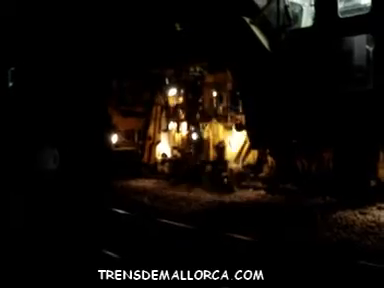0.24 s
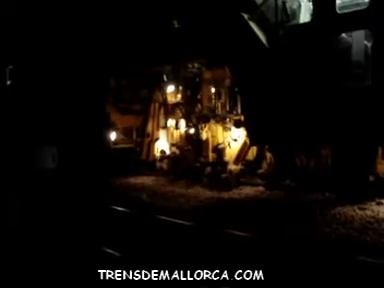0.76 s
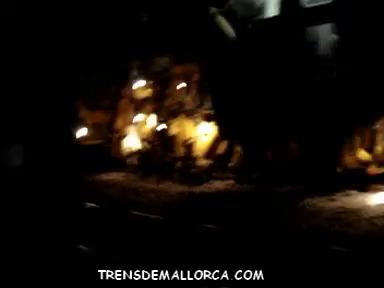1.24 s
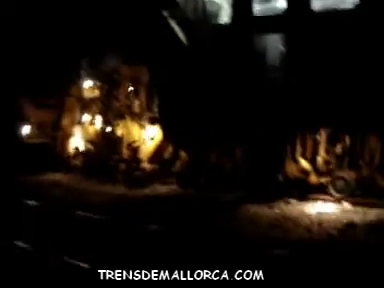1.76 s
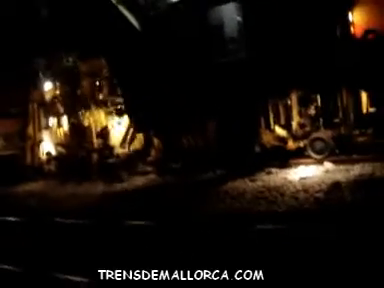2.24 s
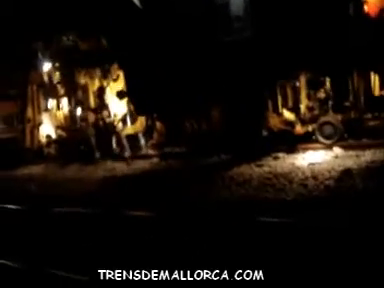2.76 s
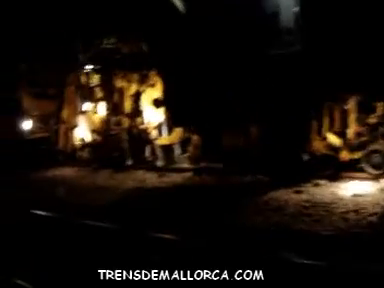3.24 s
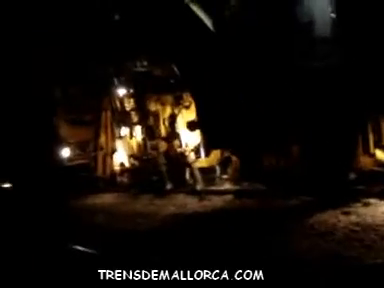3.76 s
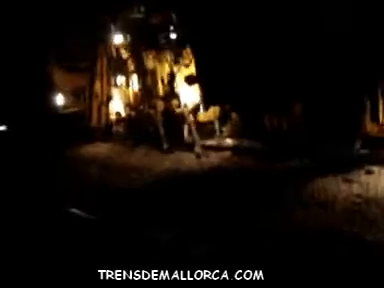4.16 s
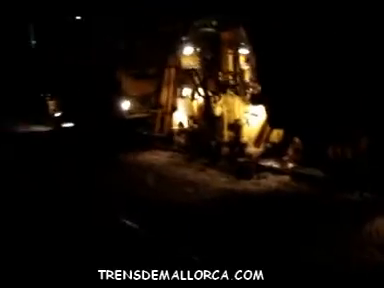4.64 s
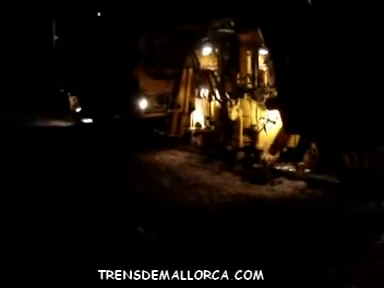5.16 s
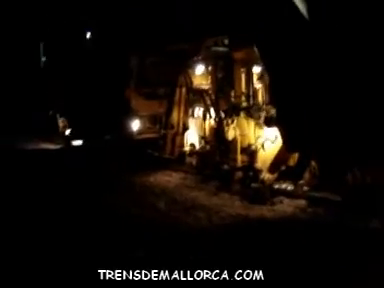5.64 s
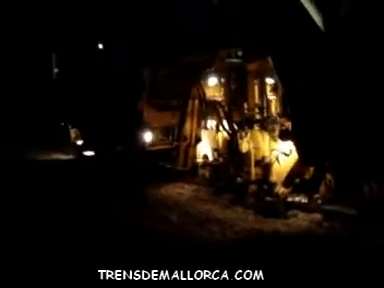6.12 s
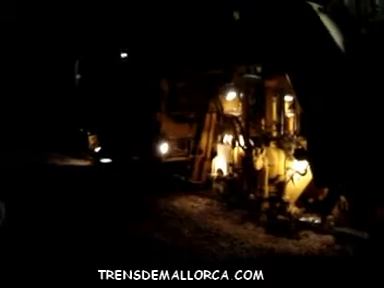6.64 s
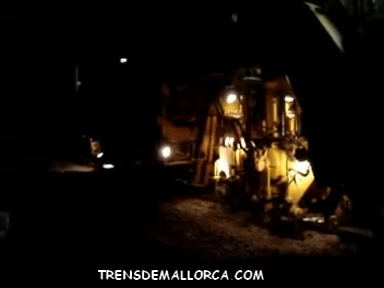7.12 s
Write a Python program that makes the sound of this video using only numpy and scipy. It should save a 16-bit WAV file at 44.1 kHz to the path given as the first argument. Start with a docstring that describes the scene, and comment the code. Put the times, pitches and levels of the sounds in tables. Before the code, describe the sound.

Outdoors beside a railway track, a ballast tamping machine works close by. Diesel drone and fan roar stay constant. Stones knock and an air valve hisses at the start while the vibrating tines hum and rattle; then pipes rush with oil as the unit lifts, air puffs again, and the churning returns in shorter cycles under a brighter hiss. Fairly close, full, centred pickup with slight reflections.

```python
"""Beside a railway track: a tamping machine at work, both channels alike.
Harmonic sines make the diesel drone, the pump whine and the hum and singing of the tamping unit.
Tine blows and random stone contacts ring frame and plates; a throbbing rush climbs and sinks in pitch.
Shaped noise makes the roar, rushing oil, hisses of air and knocks; a drifting ground echo combs the roar.
"""
import sys
import numpy as np
from scipy import signal
from scipy.fft import rfft, irfft, next_fast_len
from scipy.io import wavfile
from scipy.ndimage import map_coordinates

SR = 44100
rng = np.random.default_rng(int(sys.argv[2]) if len(sys.argv) > 2 else 0)


def wrap_up_sound(samples):
    """Save the sound to the file named by the first command line argument, as 16-bit audio."""
    columns = np.atleast_2d(samples).T
    # keep every value between -1 and 1, then stretch to whole-number steps
    tamed = np.clip(columns, -1, 1)
    steps = np.round(tamed * 32767).astype(np.int16)
    wavfile.write(sys.argv[1], SR, steps)


N = 325437

# Roar of engine bay and fans: (time [s], relative level [dB])
ROAR_DB = [(0, -23.5), (.55, -23), (.9, -24.5), (2, -25.5), (2.95, -24.5), (3.7, -25), (4.05, -24),
           (5, -23.5), (5.8, -25), (6.78, -24.5), (6.93, -23), (7.38, -23.3)]
# Low rumble: (time [s], relative level [dB])
RUMBLE_DB = [(0, -33), (.6, -28.7), (1.4, -32), (2.6, -32.5), (4, -31), (5, -30), (5.8, -36.5),
             (6.7, -36.5), (6.92, -31), (7.38, -32)]
# Spectra of rumble, roar body and fizz: (frequency [Hz], relative density [dB per Hz])
RUMBLE_SPECTRUM = [(20, -36.5), (50, -14), (85, -9.5), (125, -2.5), (175, -4), (230, -2), (285, 2),
                   (350, -2), (430, -10.5), (600, -14), (1200, -59.5)]
BODY_SPECTRUM = [(200, -19), (400, 0), (550, 0.5), (800, 4.5), (1100, 2), (1300, 1), (1470, 0.5),
                 (1700, -.5), (1950, 0), (2250, -2.5), (2700, 1), (3100, -1), (3500, -7), (5000, -21),
                 (9000, -41)]
FIZZ_SPECTRUM = [(1500, -33), (3000, -3.5), (4000, -2.5), (5000, -2), (6000, -3), (7800, -7), (9400, -7),
                 (10200, -13.5), (11000, -17.5), (12000, -43.5)]
# Ground echo: (time [s], first reinforced frequency [Hz], echo share [0-1])
GROUND_ECHO = [(0, 670, 0.28), (1.5, 830, 0.22), (1.9, 866, 0.6), (2.7, 1040, 0.37), (3.6, 1153, 0.44),
               (4.2, 1177, 0)]

# Diesel: (time [s], firing rate [Hz])
FIRING_HZ = [(0, 112), (.2, 109.1), (.8, 108.8), (1.4, 107.7), (2.15, 107), (3.1, 108.2), (4, 108.4),
             (4.22, 111.8), (4.42, 112.4), (4.7, 108.5), (6.1, 107.3), (6.7, 107.1), (6.95, 110.9),
             (7.38, 110.7)]
# Exhaust fundamental, second and third harmonic: (time [s], relative level [dB])
FIRST_DB = [(0, -29), (1.5, -27), (2, -24), (3.85, -24), (4.68, -29), (5.6, -25.5), (6.4, -26),
            (7.38, -28.5)]
SECOND_DB = [(0, -34.5), (.5, -33.5), (2.6, -29), (4.5, -31), (6.3, -29), (7.38, -30)]
THIRD_DB = [(0, -29), (1.5, -32), (3, -30.5), (4.55, -30), (4.63, -44), (6.7, -45), (6.85, -34.5),
            (7.38, -34)]
# Weak engine lines: (multiple of firing rate [-], mean level [dB])
ENGINE_LINES = [(1.29, -50), (1.5, -45.5), (2.25, -44), (2.5, -44.5), (2.7, -42), (5, -48.5)]

# Hydraulic pump: (time [s], piston rate before flutter [Hz])
PISTON_HZ = [(0, 348.5), (.45, 339), (1, 334.4), (1.35, 329.1), (1.7, 325.5), (2.15, 323.7), (2.6, 329.6),
             (3.1, 336.3), (3.35, 338.9), (4.2, 342.1), (4.45, 344.2), (4.7, 344.7), (5.05, 338.9),
             (5.5, 333), (6.1, 326.2), (6.4, 323.7), (6.9, 321.8), (7.38, 324.6)]
# Steady pump harmonics: (multiple of piston rate [-], relative level [dB])
PUMP_ORDERS = [(1, -44), (2, -39), (5, -44), (6, -43), (8, -43), (9, -42), (10, -46), (11, -48), (12, -46),
               (13, -51), (17, -52), (18, -53), (21, -57)]
# Pump harmonics singing out: (start [s], end [s], multiple of piston rate [-], relative level [dB])
SQUEALS = [(.85, 1.3, 2, -28.5), (.88, 1.5, 5, -35.5), (1.4, 2.15, 12, -41.5), (1.4, 2.45, 9, -36),
           (1.6, 2.75, 17, -44), (1.7, 3.3, 18, -47), (1.8, 2.35, 11, -43), (2.45, 3.6, 9, -34.8),
           (2.72, 3.1, 5, -29.8), (2.75, 3.1, 10, -33.5), (3, 4.15, 8, -39.5), (3.05, 3.6, 1, -38),
           (3.3, 3.66, 12, -38), (3.6, 4.1, 11, -40), (3.85, 4.15, 9, -35), (4.05, 4.38, 12, -35.2),
           (4.08, 4.45, 10, -34.5), (4.85, 5.5, 9, -36), (5.36, 5.58, 10, -34), (5.4, 5.6, 8, -33),
           (5.78, 6.08, 9, -27.8), (5.95, 6.22, 10, -32.5), (6.08, 6.55, 9, -36), (6.45, 7.2, 11, -40),
           (6.95, 7.25, 10, -36.5)]
SQUEAL_EDGE_S = 0.138  # swell and fade

# Oil through the valves while the tamping unit is raised: (time [s], level [dB])
OIL_DB = [(0, -68.5), (2.5, -36), (3.1, -27.5), (3.9, -26), (4.6, -34), (5.3, -62.5)]
# Pipe resonances: (frequency [Hz], width [Hz], relative level [dB])
PIPES = [(450.4, 46, 1.5), (1136, 52, 1.5), (1450, 137, -9), (1960, 138, 0)]

# Air valves: (time [s], open time [s], peak level [dB], rise constant [s],
#              decay to -60 dB [s], brightness [dB per octave])
AIR_VALVES = [(.2, .01, -21, 0.0135, 0.17, 0), (.24, .04, -18, .018, 1.3, .7),
              (2.484, .018, -22, .005, .06, 2.4), (4.51, .04, -20.2, .024, .45, 1.1),
              (4.59, .06, -23.5, .02, .15, 1.3)]
# Air spectrum before brightness: (frequency [Hz], relative density [dB per Hz])
AIR_SPECTRUM = [(800, -14.5), (1500, -3), (2500, 2.5), (3400, 2.5), (4500, -.5), (6000, -5.5), (9400, -11),
                (10300, -23), (12000, -32)]
# Upper hiss: (time [s], level before throb [dB])
HISS_DB = [(0, -43), (2.8, -44.5), (3.3, -42.5), (4.4, -33.5), (4.9, -32.5), (5.5, -30.5), (5.9, -33.5),
           (6.78, -35.5), (6.88, -31.5), (7.38, -31.5)]
# Hiss spectrum: (frequency [Hz], relative density [dB per Hz])
HISS_SPECTRUM = [(2500, -29), (3400, 0), (4200, 1), (4700, -10.5), (6000, -30.5)]

# Throbbing rush: (time [s], centre [Hz], relative level [dB])
RUSH = [(.3, 620, -32), (.85, 790, -28.5), (1.6, 850, -25), (2.2, 875, -27.5), (2.6, 950, -27.5),
        (3.1, 905, -31), (4.15, 860, -30), (4.4, 790, -28.5), (4.62, 650, -33), (4.82, 610, -24),
        (5.02, 590, -28), (5.6, 616.8, -44)]
# Rush surges as ballast gives way: (time [s], centre [Hz], peak level before throb [dB], Gaussian sigma [s])
SURGES = [(0.489, 600, -24, 0.028), (0.729, 700, -19, 0.0287), (1.073, 760, -25.5, 0.0263),
          (1.59, 850, -21, 0.0207), (2.22, 840, -30, .05), (4.37, 640, -24.5, 0.045), (4.85, 670, -26, .08)]

# Stones struck by the tines: (time [s], relative peak [dB])
KNOCKS = [(0.196, -3.5), (0.462, -4), (0.495, -4.5), (0.582, -5.5), (0.737, -4.5), (0.883, -6.5),
          (1.504, -9), (1.593, -12.5), (3.24, -9), (5.139, -9)]
# Stone spectrum: (frequency [Hz], relative density [dB per Hz])
STONE_SPECTRUM = [(200, -35.5), (500, 4), (750, -0.5), (1300, -6), (2800, -11.5), (5000, -14),
                  (10000, -29.5)]
# Resonances of frame and plates: (frequency [Hz], width [Hz], relative level [dB])
FRAME = [(559.2, 34.5, -1), (586.9, 30, -2.5), (677, 45, -.5)]
PLATE = [(1128, 42, 6), (1474, 56, -7.5), (1899, 31, -1)]

# Tamping unit: (time [s], vibration rate before random drift [Hz])
VIBRATION_HZ = [(0, 34.51), (1.5, 33.11), (2.2, 33.3), (3, 34.5), (4.3, 35.11), (6, 32.62), (6.5, 32.2),
                (7.38, 32.46)]
# Tine hum: (multiple of vibration rate [-], relative level [dB])
TINE_ORDERS = [(1, -18.5), (2, 0.5), (3, -9), (5, -3), (6, -2.5)]
# Vibration harmonics meeting a resonance: (start [s], end [s], multiple of vibration rate [-], mean level [dB])
SINGING = [(3.3, 4.35, 4, -35), (4.9, 5.25, 6, -32), (5.25, 6.8, 6, -39), (5.0, 5.9, 20, -32.5),
           (5.0, 5.55, 16, -35), (5.0, 5.6, 34, -33), (5.0, 5.6, 33, -32), (5.55, 6.2, 34, -35),
           (5.7, 6.45, 21, -34), (6.2, 7.2, 20, -35), (6.3, 7.38, 18, -32.3), (6.45, 7.38, 35, -32.5),
           (6.75, 7.2, 34, -32), (6.85, 7.38, 33, -36), (7.08, 7.38, 21, -30)]
# Squeezes in the ballast: (start [s], end [s], relative hum [dB], relative frame ring [dB],
#                           relative plate ring [dB])
SQUEEZES = [(0.557, 1.62, -43.5, -23.5, -32.5), (2.0, 2.22, -46.5, -29.5, -38.5),
            (4.7, 5.25, -45.5, -26, -25), (5.45, 5.951, -45.5, -25, -29), (6.279, 6.52, -49, -26, -28),
            (6.75, 7.382, -49, -26, -28)]
LOWER_S, SETTLE_S, GRIP_S = 0.637, 0.229, 0.304  # frame lead, edge length, plate lag
BITE_S, PLUNGE_DB, PLUNGE_S = 0.076, 7.5, 0.67  # hum rise; surge dying as the stones yield
FREE_HUM_DB, FREE_FRAME_DB, FREE_PLATE_DB = -52.5, -34, -34  # tines swinging free, relative

TOP_HZ = 11450


def amp(db):
    """Decibels to gain."""
    return 10 ** (np.asarray(db) / 20)


def unit(x):
    """Scale to rms 1."""
    return x / np.sqrt(np.mean(x ** 2) + 1e-20)


def curves(rows):
    """One value per sample for each column after the time."""
    time_s, *columns = np.transpose(rows)
    return [np.interp(np.arange(N) / SR, time_s, column) for column in columns]


def since(start_s):
    """Seconds since start_s, 0 before it."""
    return np.maximum(np.arange(N) / SR - start_s, 0)


def gate(start_s, end_s, rise_s, fall_s):
    """0-1 envelope with linear edges centred on start and end."""
    t = np.arange(N) / SR
    return np.clip(.5 + np.minimum((t - start_s) / rise_s, (end_s - t) / fall_s), 0, 1)


def wobble(rate_hz):
    """Smooth random curve, rate_hz knots a second."""
    position = np.arange(N) * rate_hz / SR
    grid = np.arange(0, position[-1] + 1, 1 / 8)
    knots = rng.standard_normal(int(position[-1]) + 4)
    return np.interp(position, grid, map_coordinates(knots, [grid]))


def filtered(x, response):
    """Multiply the spectrum of x by a function of frequency."""
    m = next_fast_len(N + SR // 2)
    return irfft(rfft(x, m) * response(np.fft.rfftfreq(m, 1 / SR)), m)[:N]


def coloured(x, spectrum):
    """Shape x by a (Hz, dB) spectrum, at rms 1."""
    f, db = np.transpose(spectrum)
    return unit(filtered(x, lambda hz: amp(np.interp(np.log(hz + 1), np.log(f), db))))


def resonate(x, modes):
    """Parallel resonances of alternating sign, at rms 1."""
    def response(f):
        total = 0
        for k, (centre, width, db) in enumerate(modes):
            damping = 1j * f * width
            total = total + (-1) ** k * amp(db) * damping / (centre ** 2 - f * f + damping)
        return total
    return unit(filtered(x, response))


def noise(patchy_db):
    """Noise with random gain patches in time and frequency, at rms 1."""
    z = signal.stft(rng.standard_normal(N), nperseg=1024)[2]
    patch = np.outer(np.hanning(16), np.hanning(14))
    field = signal.fftconvolve(rng.standard_normal(z.shape), patch, "same")
    return unit(signal.istft(z * amp(patchy_db * unit(field)), nperseg=1024)[1][:N])


def noise_band(hz, half_width_hz):
    """Narrow noise on quadrature carriers at a moving centre, at rms 1."""
    def lowpass(f):
        return 1 / (1 + (f / half_width_hz) ** 2)
    in_phase = filtered(rng.standard_normal(N), lowpass)
    quadrature = filtered(rng.standard_normal(N), lowpass)
    centre = angle(hz)
    return unit(in_phase * np.cos(centre) + quadrature * np.sin(centre))


def angle(hz):
    """Running phase [rad] at a varying rate, from a random start."""
    return 2 * np.pi * (np.cumsum(hz) / SR + rng.random())


def tone(phase, db):
    """Sine of the given rms level, randomly offset in phase."""
    return np.sqrt(2) * amp(db) * np.sin(phase + 2 * np.pi * rng.random())


def walls(x, share=0.1885, count=14):
    """Weak copies from the machine's sides and nearby walls comb the sound."""
    delay_s = rng.uniform(.004, .04, count)
    gain = rng.choice([-1, 1], count) / np.sqrt(count)
    copies = sum(g * np.pad(x, (int(d * SR), 0))[:N] for d, g in zip(delay_s, gain))
    return (x + share * copies) / np.hypot(1, share)


def ground_echo(x, dull_hz=1050):
    """The ground returns a dull copy whose delay drifts as the machine moves."""
    hz, share = curves(GROUND_ECHO)
    echo = filtered(x, lambda f: 1 / (1 + (f / dull_hz) ** 4))
    return x + share * np.interp(np.arange(N) - SR / hz, np.arange(N), echo)


def roar(firing, shaft, rumble_db=1.7, body_db=4.0, fizz_db=-29.0, fizz_follows=0.66):
    """Engine bay and cooling fans: low rumble, broad body and fizz; the last two beat with the machinery."""
    level, = curves(ROAR_DB)
    beat_db = 0.213 * np.sin(firing) + 0.22 * np.sin(shaft)
    beat_db = beat_db + 0.803 * wobble(24) + 0.59 * wobble(90)
    low = amp(curves(RUMBLE_DB)[0] + rumble_db) * coloured(noise(patchy_db=1.0), RUMBLE_SPECTRUM)
    body = ground_echo(coloured(noise(patchy_db=0.44), BODY_SPECTRUM))
    mid = amp(level + body_db + beat_db) * body
    fizz_level = fizz_db + fizz_follows * (level - level.mean()) + beat_db
    fizz = amp(fizz_level) * coloured(noise(patchy_db=0.91), FIZZ_SPECTRUM)
    return low + mid + fizz


def diesel(firing, first_db=-1.0, waver_db=0.52, second_waver_db=0.66, third_waver_db=0.64):
    """Exhaust harmonics of the firing rate, plus weaker lines from unequal cylinders."""
    levels = [curves(FIRST_DB)[0] + first_db + waver_db * wobble(12),
              curves(SECOND_DB)[0] + second_waver_db * wobble(12),
              curves(THIRD_DB)[0] + third_waver_db * wobble(16)]
    drone = sum(tone(k * firing, db) for k, db in enumerate(levels, 1))
    lines = sum(tone(k * firing + 0.335 * wobble(7), db + 3 * wobble(3.09)) for k, db in ENGINE_LINES)
    return drone + lines


def pump(flutter=0.0004, level_db=-0.5, squeal_db=0.0, waver_db=1.5):
    """Wavering piston harmonics; now and then one squeals."""
    phase = angle(curves(PISTON_HZ)[0] * (1 + flutter * wobble(70)))
    whine = 0
    for k, db in PUMP_ORDERS:
        steady = amp(db + level_db + 1.86 * wobble(3.01))
        squeal = 0
        for start, end, multiple, peak_db in SQUEALS:
            if round(multiple) == round(k):
                edges = gate(start, end, SQUEAL_EDGE_S, SQUEAL_EDGE_S)
                squeal = squeal + amp(peak_db + squeal_db) * edges
        whine = whine + np.hypot(steady, squeal) * tone(round(k) * phase, waver_db * wobble(22))
    return whine


def oil_flow():
    """Oil forced through the valves sounds the pipework: noise through resonances."""
    return amp(curves(OIL_DB)[0]) * resonate(rng.standard_normal(N), PIPES)


def valves():
    """Air puffs swell quickly, hold while open and fade as the pressure drops."""
    t = np.arange(N) / SR
    puffs = 0
    for start, hold, db, rise, t60, tilt in AIR_VALVES:
        flow = amp(db - 60 * since(start + hold) / t60) * np.exp(np.minimum(t - start, 0) / rise)
        spectrum = [(hz, level + tilt * np.log2(hz)) for hz, level in AIR_SPECTRUM]
        puffs = puffs + flow * coloured(rng.standard_normal(N), spectrum)
    return puffs


def upper_hiss(shaft, throb_db=1.0):
    """Bright patchy noise, stronger in the second half, throbs with the tines."""
    level_db = curves(HISS_DB)[0] + throb_db * np.sin(shaft)
    return amp(level_db) * coloured(noise(patchy_db=1.5), HISS_SPECTRUM)


def strands(shaft, centre_hz, half_width_hz=62, jitter_rad=0.6, first_order=16, last_order=30):
    """Vibration harmonics stand out as a moving resonance passes them; rms 1."""
    rate_hz, = curves(VIBRATION_HZ)
    total = 0
    for k in range(first_order, last_order + 1):
        phase = k * shaft + 2 * np.pi * rng.random() + jitter_rad * wobble(20)
        total = total + np.sin(phase) / (1 + ((k * rate_hz - centre_hz) / half_width_hz) ** 2)
    return unit(total)


def sweeping_rush(shaft, half_width_hz=88, level_db=-2.2, strands_db=-4.5, throb_db=1.5, surge_width_hz=95):
    """Noise and tonal strands share a band that climbs and sinks; short surges add to it."""
    t = np.arange(N) / SR
    hz, db = curves(RUSH)
    rush = amp(db + level_db) * noise_band(hz, half_width_hz)
    swell = sum(amp(peak) * np.exp(-.5 * ((t - s) / sigma) ** 2) for s, _, peak, sigma in SURGES)
    surges = swell * noise_band(curves(SURGES)[0], surge_width_hz)
    throb = unit(amp(throb_db * np.sin(shaft)))
    return (rush + surges) * throb + amp(db + strands_db) * strands(shaft, hz)


def stones(t60_s=0.0643, level_db=-10):
    """Single hard knocks: noise bursts with instant onset and exponential decay."""
    t = np.arange(N) / SR
    blows = sum((t >= s) * amp(db + level_db - 60 * np.abs(t - s) / t60_s) for s, db in KNOCKS)
    return blows * coloured(rng.standard_normal(N), STONE_SPECTRUM)


def gravel(shaft, rate_hz, spread_db, throb_db):
    """Dense stone contacts of uneven size, weighted by each tine swing; rms 1."""
    hits = rng.random(N) < rate_hz / SR
    contacts = hits * rng.standard_normal(N) * amp(spread_db * rng.standard_normal(N))
    return unit(contacts * amp(throb_db * np.sin(shaft)))


def swings(shaft, scatter_db=2):
    """One tine blow per shaft turn, each of its own strength; rms 1."""
    turns = np.floor(shaft / (2 * np.pi))
    return unit(np.diff(turns, prepend=turns[0]) * amp(scatter_db * rng.standard_normal(N)))


def churning(uneven_db=0.43):
    """Ring gains: the frame once the unit is down, the plates later, once the tines grip."""
    frame, plate = amp(FREE_FRAME_DB), amp(FREE_PLATE_DB)
    for start, end, _, frame_db, plate_db in SQUEEZES:
        lowered = gate(start - LOWER_S, end, SETTLE_S, SETTLE_S)
        gripped = gate(start + GRIP_S, end + GRIP_S, SETTLE_S, SETTLE_S)
        frame = np.maximum(frame, amp(frame_db) * lowered)
        plate = np.maximum(plate, amp(plate_db) * gripped)
    return frame * amp(uneven_db * wobble(10)), plate * amp(uneven_db * wobble(10))


def ballast(shaft, frame_db=-3.0, plate_db=-0.5, crunch_db=-10.0, regular=1.1):
    """Tine blows and churned stones ring frame and plates; the stones also crunch."""
    frame, plate = churning()
    drive = gravel(shaft, rate_hz=2500, spread_db=4.0, throb_db=-1.5)
    drive = drive + regular * swings(shaft, scatter_db=3.0)
    frame_ring = frame * amp(frame_db) * resonate(drive, FRAME)
    plate_ring = plate * amp(plate_db) * resonate(drive, PLATE)
    contacts = gravel(shaft, rate_hz=1300, spread_db=2.5, throb_db=3.0)
    crunch = frame * amp(crunch_db) * coloured(contacts, STONE_SPECTRUM)
    return frame_ring + plate_ring + crunch


def tine_hum(shaft, waver_db=2.0, load_db=1.54, singing_waver_db=2.0, jitter_rad=0.66):
    """The eccentric shaft shakes unit and track, hardest at the plunge; stones jostle the singing's phase."""
    pressed = 0
    for start, end, db, *_ in SQUEEZES:
        plunge_db = PLUNGE_DB * np.exp(-since(start) / PLUNGE_S)
        pressed = pressed + gate(start, end + BITE_S, BITE_S, SETTLE_S) * amp(db + plunge_db)
    gain = np.hypot(amp(FREE_HUM_DB), pressed) * amp(load_db * wobble(5.1))
    highest = max(k for _, _, k, _ in SINGING)
    singing = 0
    for start, end, k, db in SINGING:
        phase = round(k) * shaft + jitter_rad * np.sqrt(k / highest) * wobble(30)
        voice = tone(phase, db + singing_waver_db * wobble(24))
        singing = singing + gate(start, end, SETTLE_S, SETTLE_S) * voice
    hum = gain * sum(tone(round(k) * shaft, db + waver_db * wobble(12)) for k, db in TINE_ORDERS)
    return singing + hum


def scene():
    """Sum all parts, alike in both channels; roar, air and knocks also reflect off the walls."""
    firing = angle(curves(FIRING_HZ)[0])
    shaft = angle(curves(VIBRATION_HZ)[0] * (1 + .004 * wobble(8)))
    reflected = walls(roar(firing, shaft) + valves() + stones())
    tamping = upper_hiss(shaft) + sweeping_rush(shaft) + ballast(shaft) + tine_hum(shaft)
    machine = reflected + diesel(firing) + pump() + oil_flow() + tamping
    return np.array([machine, machine])


def record(dry):
    """Band limit: nothing passes at or above TOP_HZ."""
    return np.array([filtered(channel, lambda hz: hz < TOP_HZ) for channel in dry])


dry = scene()
out = record(dry)
wrap_up_sound(out)
```